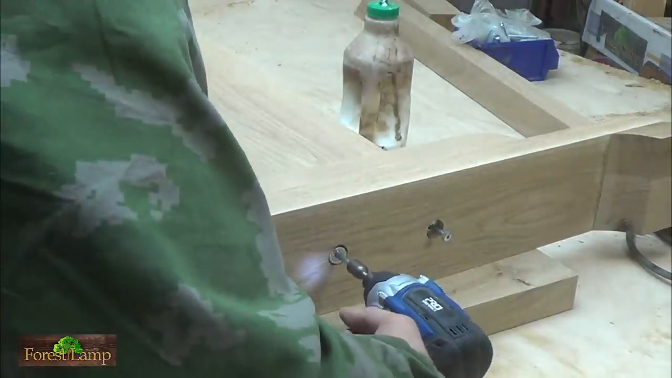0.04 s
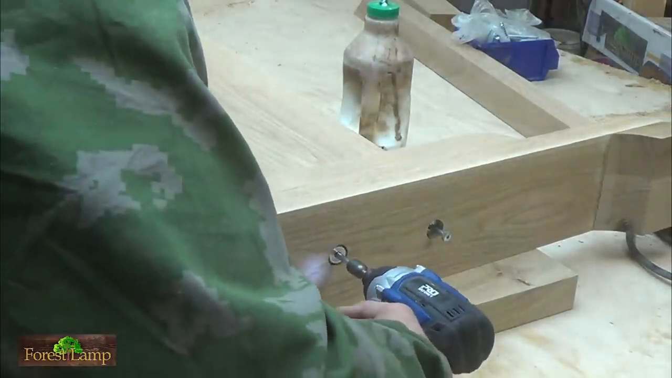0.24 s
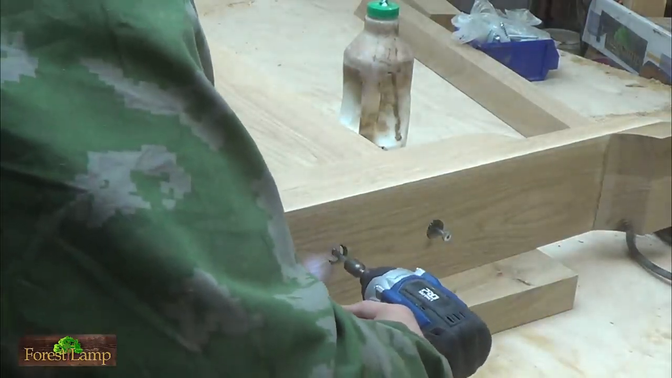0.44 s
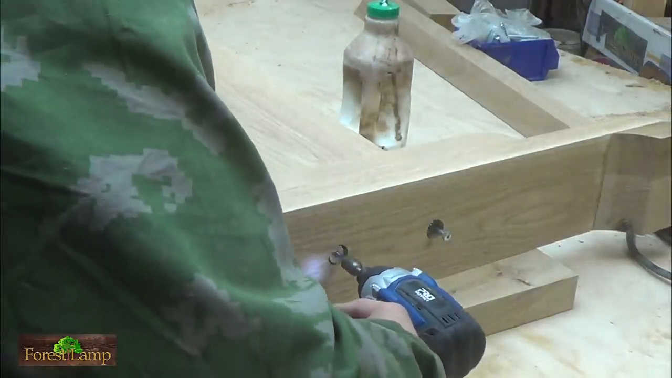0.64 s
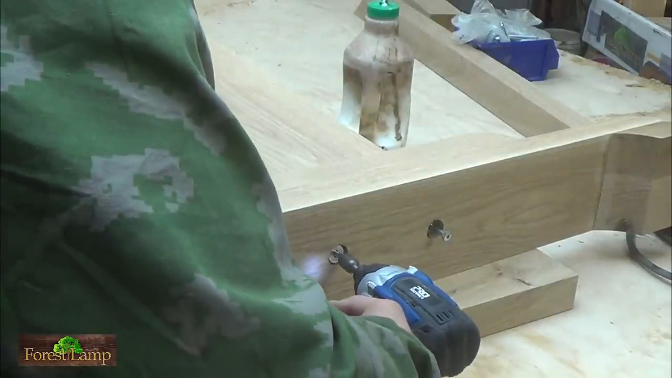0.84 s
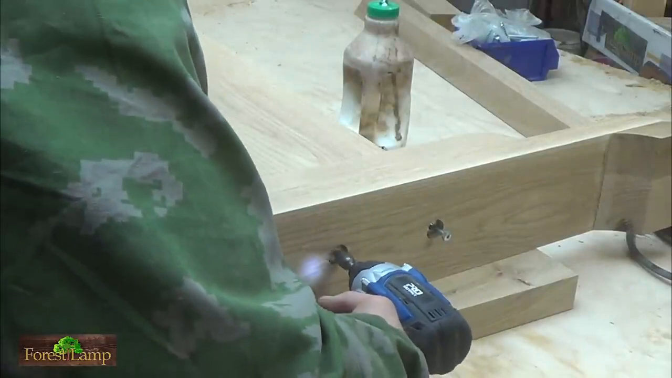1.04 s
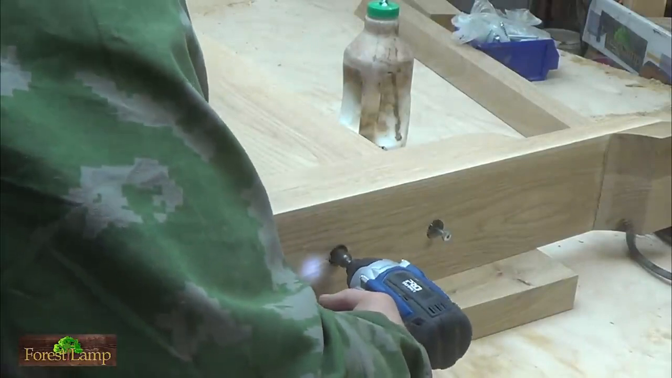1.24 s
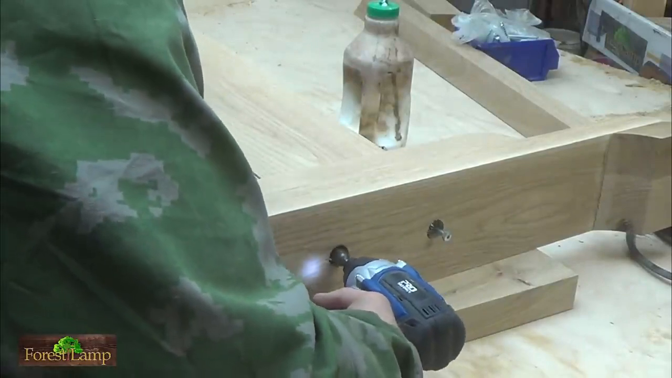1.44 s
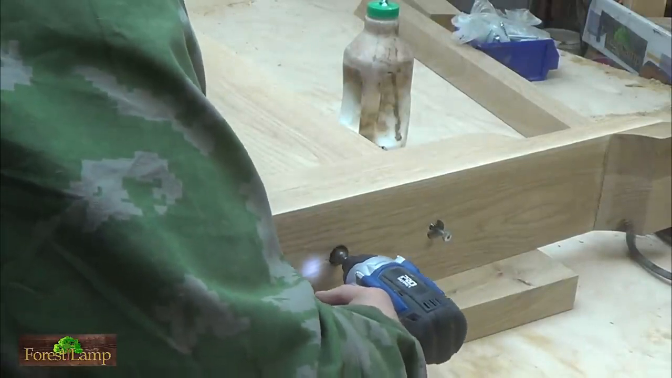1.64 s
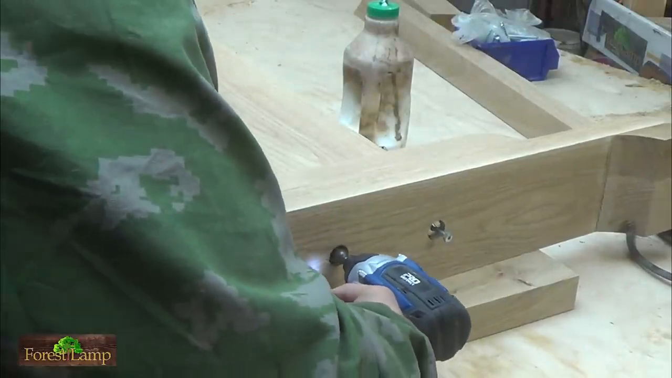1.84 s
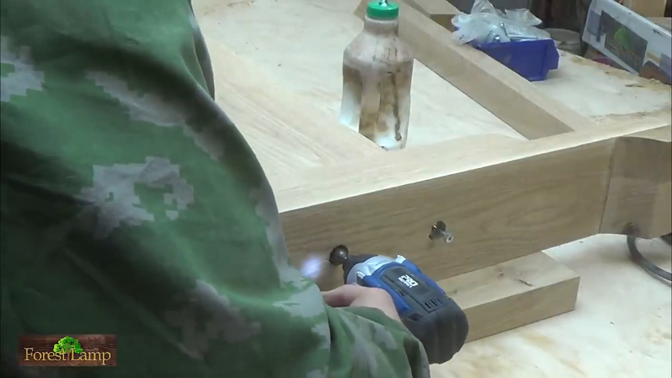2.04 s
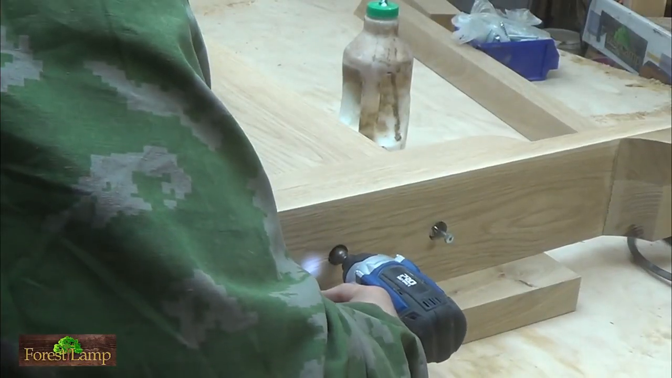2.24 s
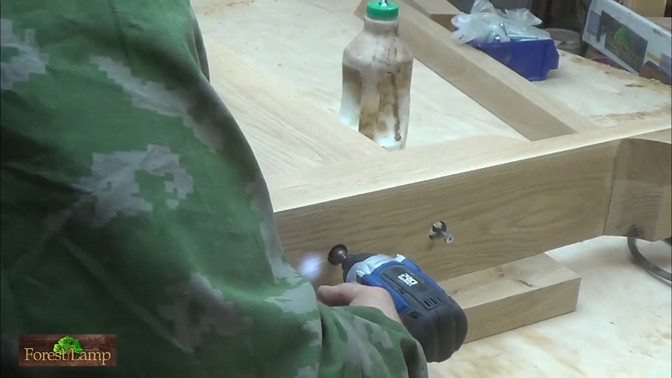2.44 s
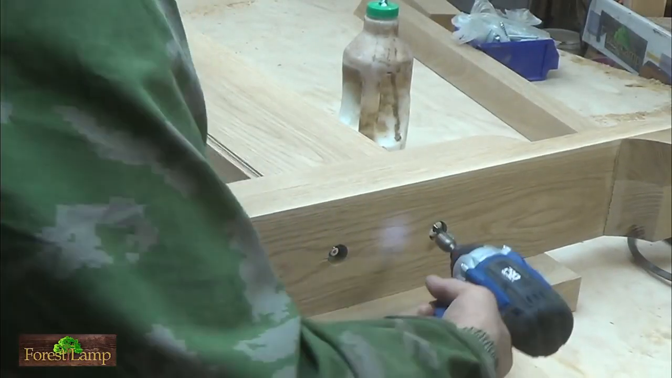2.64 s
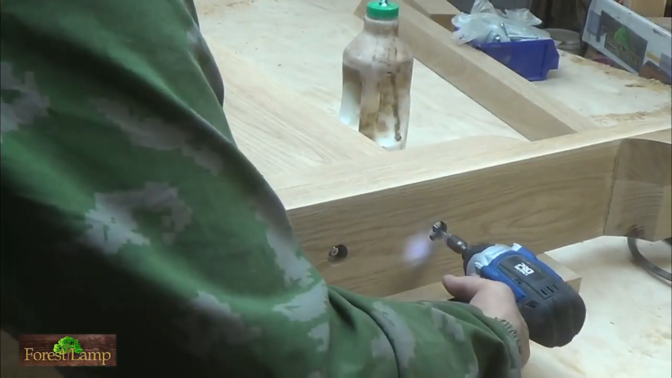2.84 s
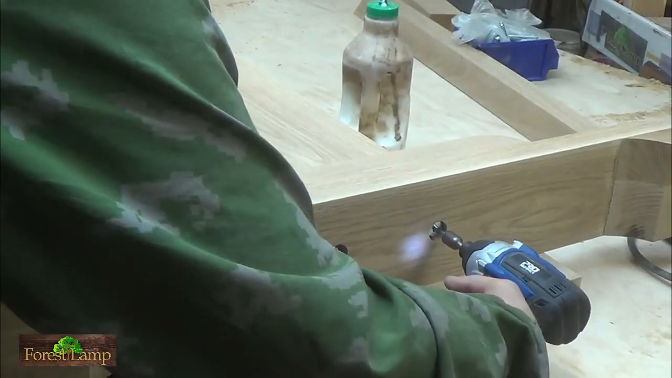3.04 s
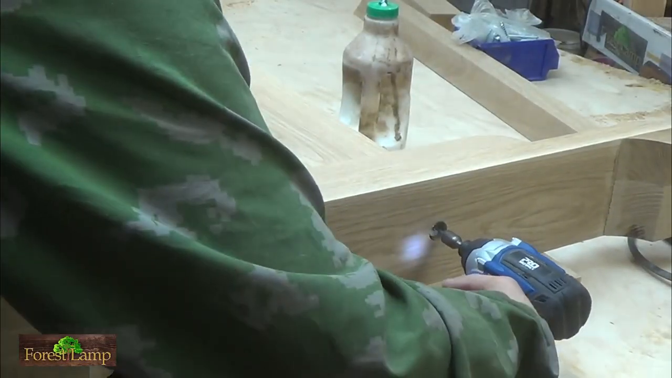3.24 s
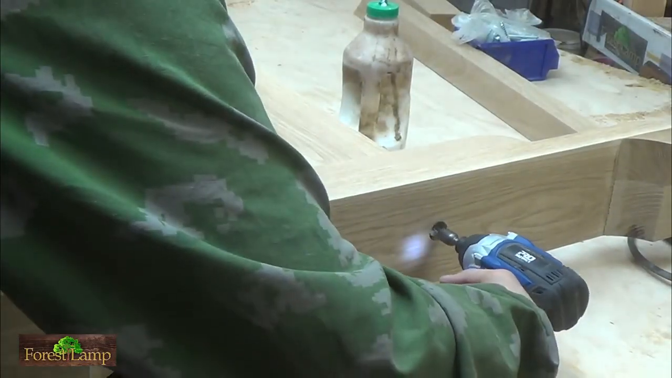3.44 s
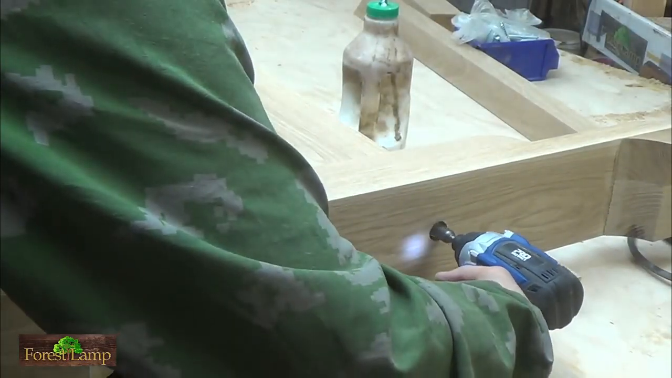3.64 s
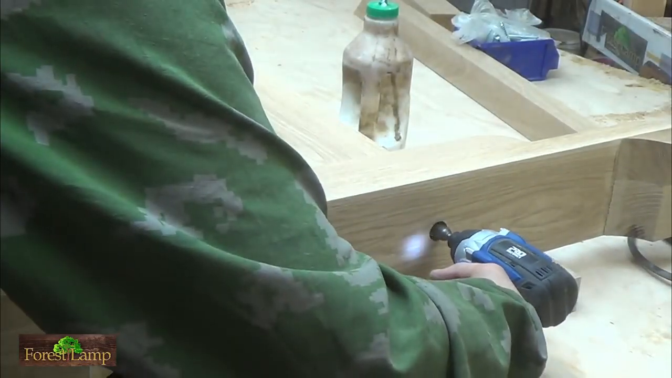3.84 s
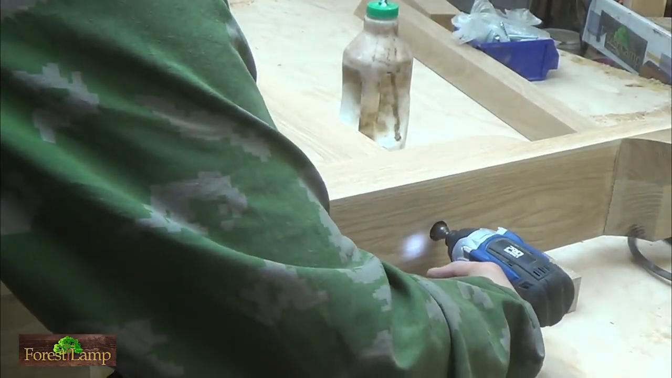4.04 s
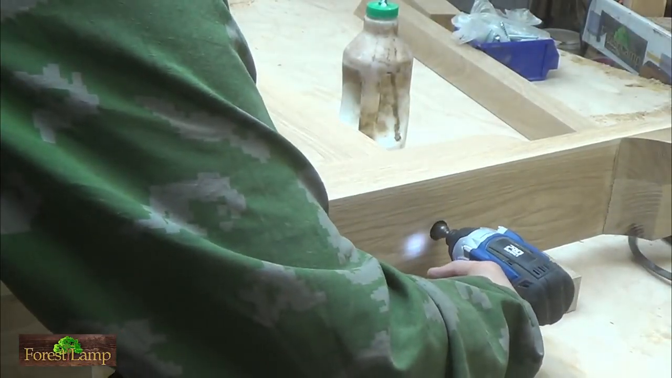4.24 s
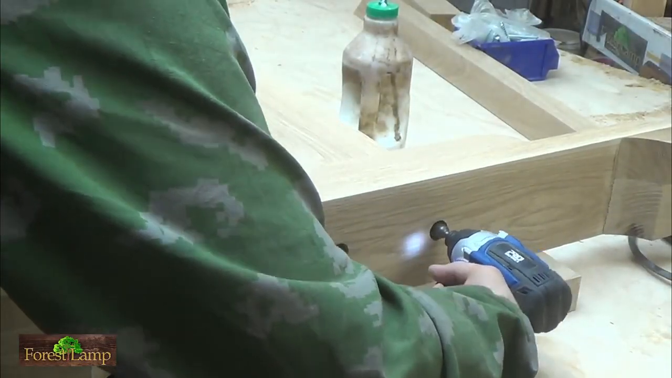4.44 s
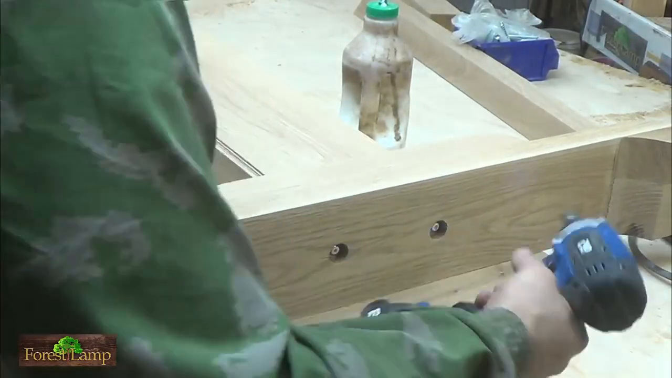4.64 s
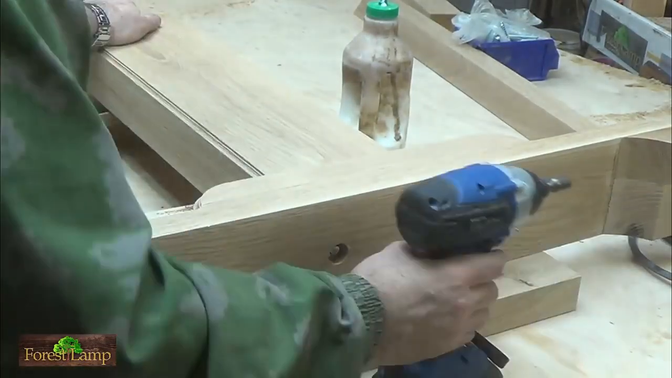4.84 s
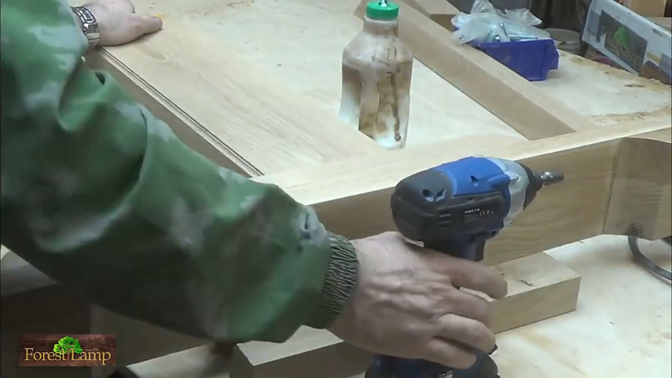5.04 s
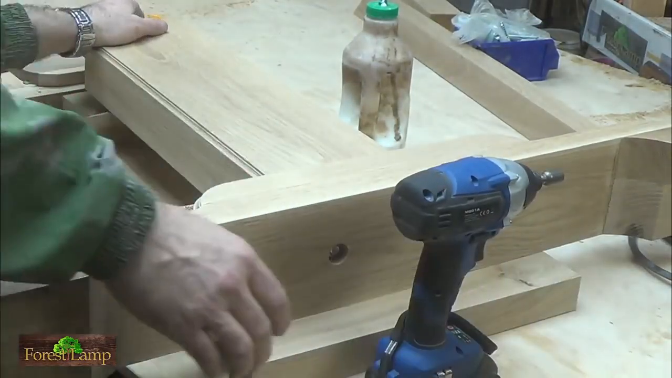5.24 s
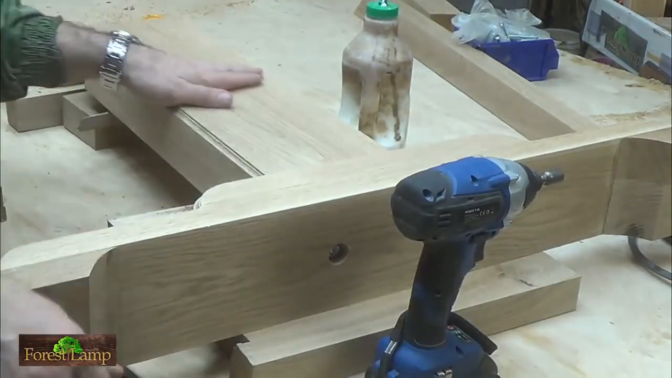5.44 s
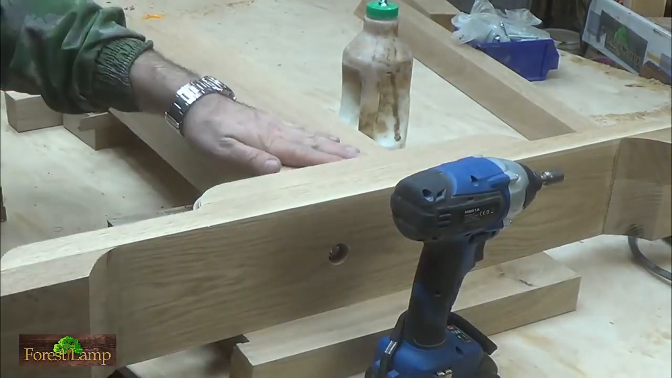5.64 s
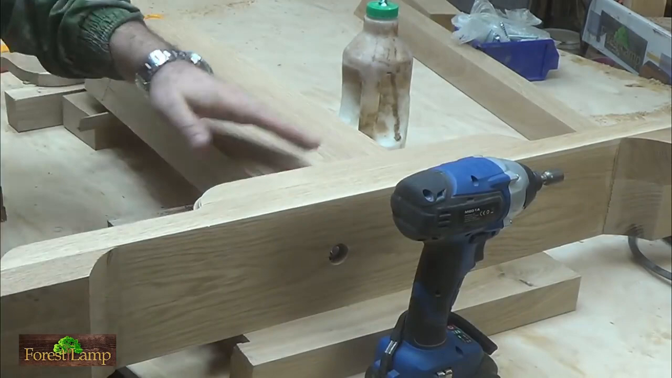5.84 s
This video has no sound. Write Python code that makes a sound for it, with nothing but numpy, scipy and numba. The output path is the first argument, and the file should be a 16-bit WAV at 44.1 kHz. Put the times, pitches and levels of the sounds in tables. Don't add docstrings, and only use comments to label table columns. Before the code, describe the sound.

Two harsh rattling bursts of an impact driver on wood, a short pause between them, then dull knocks and a soft hand rub.

```python
import sys
import numpy as np
from scipy import signal
from scipy.fft import rfft, irfft
from scipy.io import wavfile
from scipy.ndimage import uniform_filter1d
from numba import njit

SR = 44100
rng = np.random.default_rng(int(sys.argv[2]) if len(sys.argv) > 2 else 0)


def voltage_ratio(decibels):
    exponent = np.asarray(decibels, float) / 20
    return 10 ** exponent


def file_out(sig):
    cols = np.atleast_2d(sig).T
    lim = np.clip(cols, -1, 1)
    pcm = np.round(lim * 32767).astype(np.int16)
    wavfile.write(sys.argv[1], SR, pcm)


N = 260631
TIME = np.arange(N) / SR

# hammer engages in seconds, trigger released in seconds, gear rattle in dB,
# gap between blows in seconds, time to full load in seconds.
PULLS = [
    (-0.3, 0.0033, -35.5, .026, .05),
    (0.2469, 2.465, -34, 0.02, 0.041),
    (3.157, 4.466, -33, .0275, 0.011),
]
# time in seconds, grip of the head in the wood (0-1), stiffening of the joint (0-1).
SEATING = [(0, 0, 0), (1.2, 0, 0), (1.6, 1, 0), (2.3, .7, 0), (2.42, .7, 1), (2.6, .7, 1), (3.0, 0, 0),
           (4.03, 0, 0), (4.07, 1, 0), (4.2, 1, 0), (4.27, .75, 1), (4.31, .4, 1), (5.91, .4, 1)]
# frequency in Hz, level in dB per Hz.
CRACK = [(1500, -14), (3000, -1), (4000, 4.5), (6500, -3), (8500, -5), (11500, -1.5), (14000, -13),
         (16000, -3.5)]
CRACK_S = .0013
TURN_S = .0042
ENGAGE_DB = -8


def rms_one(x):
    return x / np.sqrt(np.mean(x ** 2) + 1e-20)


def even(x, seconds=0.071):
    return x / np.sqrt(uniform_filter1d(x ** 2, int(seconds * SR)) + 1e-12)


def in_time(rows):
    s, *columns = np.transpose(rows)
    return np.array([np.interp(TIME, s, c) for c in columns])


def colour(x, points, size=4096):
    hz, db = np.transpose(points)
    grid = np.maximum(np.arange(size // 2 + 1), 1) * SR / size
    cepstrum = irfft(np.log(voltage_ratio(np.interp(np.log(grid), np.log(hz), db))))
    cepstrum[1:size // 2] *= 2
    cepstrum[size // 2 + 1:] = 0
    return signal.oaconvolve(x, irfft(np.exp(rfft(cepstrum))))[:N]


def drift(rate_hz):
    r = np.exp(-2 * np.pi * rate_hz / SR)
    noise = rng.standard_normal(N + SR)
    return rms_one(signal.lfilter([1], [1, -2 * r, r * r], noise)[SR:])


def grains(per_s, spread_db):
    sizes = voltage_ratio(spread_db * np.minimum(rng.exponential(1, N), 5)) * rng.choice([-1, 1], N)
    return rms_one(sizes * (rng.random(N) < per_s / SR))


def bursts(times, levels_db, decay_s):
    clicks = np.full(N, 1e-12)
    clicks[np.round(np.asarray(times) * SR).astype(int)] = voltage_ratio(levels_db)
    envelope = signal.lfilter([1], [1, -np.exp(-1 / (decay_s * SR))], clicks)
    return envelope * rng.choice([-1, 1], N)


@njit
def resonate(x, cosine, r):
    y = np.zeros(len(x))
    for i in range(2, len(x)):
        y[i] = x[i] - x[i - 2] + 2 * r * cosine[i] * y[i - 1] - r * r * y[i - 2]
    return y * (1 - r * r) / 2


def shop_air():
    # frequency in Hz, level in dB per Hz.
    shop_hum = [(20, -19), (46, -21), (70, -23), (105, -7.5), (135, -15), (250, -15), (318, -11.5),
                (660, -25.5), (1020, -16.5), (1300, -27.5), (2060, -27.5), (3640, -37), (12500, -56.5),
                (13500, -70)]
    hum = rms_one(colour(rng.standard_normal(N), shop_hum))
    return voltage_ratio(-64) * hum * voltage_ratio(.6 * drift(3.8))


def electronic_whine():
    # frequency in Hz, level in dB.
    whine_tones = [(15622, -84)]
    return sum(voltage_ratio(db + 5 + 1.5 * drift(20)) * np.sin(2 * np.pi * hz * TIME) for hz, db in whine_tones)


def throttle(coast_db_per_s):
    spin_db_per_s, free_db = 749, -4.5
    on, off, _, _, settle = np.transpose(PULLS)[:, :, None]
    free = (TIME < on) * (free_db + spin_db_per_s * (TIME - on))
    engaging = ENGAGE_DB * (1 - np.clip((TIME - on) / settle, 0, 1))
    braking = coast_db_per_s * np.maximum(TIME - off, 0)
    return free + engaging - braking


def chatter():
    level_db, spread_db = -1, 5.5
    speed_wander = .06
    wander, strength = rng.standard_normal((int(N / SR / TURN_S), 2)).T
    s = np.cumsum(TURN_S * (1 + speed_wander * wander))
    db = level_db + spread_db * np.clip(strength, -2, 2)
    inside = s < TIME[-1]
    return colour(bursts(s[inside], db[inside], CRACK_S), CRACK)


def gear_rattle(load, coast_db_per_s):
    # frequency in Hz, level in dB per Hz.
    housing = [(1060, -21), (1800, -17.5), (1970, -3), (2060, -14.5), (2460, -8), (3140, -2), (3410, -1.5),
               (7290, -11), (8130, -15.5), (11600, -12.5), (15000, -17.5), (16000, -38.5)]
    level_db = np.max(throttle(coast_db_per_s) + np.array(PULLS)[:, 2:3], axis=0)
    teeth = load * grains(per_s=9000, spread_db=2.5) * voltage_ratio(1.2 * drift(150))
    return voltage_ratio(level_db) * (voltage_ratio(-6.0) * rms_one(colour(teeth, housing)) + chatter())


def blow_table():
    slip_s, play_s = .005, .0008
    first_db, blow_db, spread_db = -27.5, -22, 1.5
    s, peak_db = [], []
    for on, off, _, gap, settle in PULLS:
        slip, play, strength = rng.standard_normal((120, 3)).T
        since = np.arange(1, len(slip) + 1) * gap + slip_s * slip
        at = np.r_[on, on + TURN_S * np.round(since / TURN_S) + play_s * play]
        load_db = ENGAGE_DB * (1 - np.clip(since / settle, 0, 1))
        db = np.r_[first_db, blow_db + load_db + spread_db * np.clip(strength, -2, 1.5)]
        held = (at > 0) & (at < off)
        s, peak_db = np.r_[s, at[held]], np.r_[peak_db, db[held]]
    return s, peak_db


def hammer():
    bounce_s, bounce_db, dip_s = .0042, -5, .003
    s, peak_db = blow_table()
    peak_db = peak_db - 3.0
    crack = bursts(s, peak_db, CRACK_S) + bursts(s + bounce_s, peak_db + bounce_db, CRACK_S)
    blows = bursts(s, peak_db + 17.5, decay_s=0.0033)
    dips = np.zeros(N)
    dips[((s - dip_s / 2) * SR).astype(int)] = 1
    dip_depth = .85 * np.convolve(dips, np.hanning(int(dip_s * SR)), "same")
    return colour(crack, CRACK), blows, 1 - np.clip(dip_depth, 0, 1)


def rings(force, modes):
    grip, stiff = in_time(SEATING)
    out = 0
    for hz, width_hz, level_db, grip_db, rise in modes:
        cosine = np.cos(2 * np.pi * hz * (1 + rise * stiff) / SR)
        shaken = force * rng.choice([-1, 1], N)
        mode = resonate(shaken, cosine, np.exp(-np.pi * width_hz / SR))
        mode_db = level_db + grip_db * grip + 3.0 * drift(16)
        out = out + voltage_ratio(mode_db) * even(mode, seconds=0.035)
    return out


def shaken_frame(blows, ring_coast, hum_coast):
    # frequency in Hz, width in Hz, level in dB, dB gained by grip, share of rise when stiff (0-1).
    rings_first, rings_second = [(985, 50, -13, 0, 0), (1102, 16, -10, 4, .05), (1170, 15, 1.5, -1.5, .085),
                                 (1320, 20, -16, 4, .05), (1425, 16, -8, 0, .06), (1457, 12, -4, 4, .075),
                                 (1670, 50, -16, 1, 0), (2088, 12, -5, -2, .005), (2355, 40, -19, 0, 0),
                                 (3180, 60, -15, 0, 0)], [(930, 70, -10, 0, .03), (1305, 20, -16, 21, .19),
                                                      (1580, 100, -10, 0, 0), (2100, 35, -15, -3, 0),
                                                      (2360, 30, -17, 7, 0), (2580, 40, -17, 7, 0),
                                                      (3170, 150, -10, 0, 0)]
    hums_first, hums_second = [(125, 50, -26, 12, 0), (242, 35, -5, -2, 0), (385, 60, -14, 2, .05),
                               (577, 35, -12, 11, .2)], [(238, 22, -5, -9, .05), (570, 22, -17, 13, .22),
                                                   (700, 45, -12, 9, 0)]
    # frequency in Hz, level in dB per Hz.
    wood = [(18, -51), (30, -27.5), (103, -15.5), (240, -12), (367, 2.5), (561, 15), (809, -0.5),
            (1100, -1), (1560, -11.5), (1780, -7.5), (2080, -13), (3000, -3.5), (3900, -29), (6600, -120)]
    # ring in dB, its gain by grip in dB, hum in dB, its gain by grip in dB, its gain when stiff in dB.
    frame_levels = [
        (-32, 0.5, -42, 4, -6.5),
        (-35, 3.5, -37, -0.5, -0.5),
    ]
    second = TIME > 2.8
    grip, stiff = in_time(SEATING)
    ring_db, ring_grip_db, hum_db, hum_grip_db, hum_stiff_db = np.transpose(frame_levels)[:, second.astype(int)]
    ring_db = ring_db + ring_grip_db * grip + throttle(ring_coast).max(axis=0)
    hum_db = hum_db + hum_grip_db * grip + hum_stiff_db * stiff + throttle(hum_coast).max(axis=0)

    shake = rng.standard_normal(N) * voltage_ratio(1.6 * drift(40))
    force = shake + 4.3 * blows
    broad = rms_one(colour(force, wood))
    broad_low = signal.sosfilt(signal.butter(2, 830, "low", fs=SR, output="sos"), broad)
    broad_high = signal.sosfilt(signal.butter(2, 830, "high", fs=SR, output="sos"), broad)
    ring = np.where(second, rings(force, rings_second), rings(force, rings_first))
    hum = np.where(second, rings(force, hums_second), rings(force, hums_first))
    ring = even(ring + voltage_ratio(3.0) * broad_high)
    hum = even(hum + voltage_ratio(-2.0) * broad_low)
    return voltage_ratio(ring_db) * ring + voltage_ratio(hum_db) * hum


def driver():
    # rattle, ring, hum in dB per second.
    coast_rates = (515, 387, 391)
    rattle_coast, ring_coast, hum_coast = coast_rates
    crack, blows, load = hammer()
    return gear_rattle(load, rattle_coast) + crack + shaken_frame(blows, ring_coast, hum_coast)


def spin_up():
    whine_hz, width_hz, whine_db, spin_s = 3200, 120, -63, .032
    on = np.transpose(PULLS)[0, :, None]
    gate = ((TIME > on - spin_s) & (TIME < on)).any(axis=0)
    cosine = np.full(N, np.cos(2 * np.pi * whine_hz / SR))
    tone = resonate(rng.standard_normal(N), cosine, np.exp(-np.pi * width_hz / SR))
    return voltage_ratio(whine_db) * uniform_filter1d(gate * 1., 200) * even(tone, seconds=.02)


def taps():
    # time in seconds, thud in Hz, thud in dB, tick in dB.
    contacts = [(0.2282, 1430, -57, -56), (2.5344, 1620, -60, -71), (2.7604, 1060, -59.5, -63.5),
                (2.933, 635, -56.5, -56), (2.9676, 660, -59, -64), (2.9907, 555, -43, -43),
                (3.006, 260, -55, -86), (3.118, 966, -67, -54), (4.574, 1400, -49, -52),
                (4.7557, 483, -32, -38), (4.7744, 450, -46, -98), (4.793, 495, -42, -56),
                (4.836, 471, -72, -57), (4.885, 810, -42.5, -81), (4.9024, 530, -43.5, -90),
                (4.916, 486, -49, -87), (5.08, 1020, -63, -56), (5.2214, 470, -62, -74),
                (5.692, 1030, -58, -49)]
    # frequency in Hz, level in dB per Hz.
    bench = [(100, -28), (220, -10), (500, -4), (1200, -7), (2200, -13), (3500, -26), (7000, -48)]
    thud_s, thud_width_hz, thud_rise_s = .011, 130, .0028
    s, hz, thud_db, tick_db = np.transpose(contacts)
    tick = colour(bursts(s + .001, tick_db - 2.5, decay_s=0.0034), CRACK)
    latest = np.maximum(np.searchsorted(s, TIME) - 1, 0)
    soft = np.clip((TIME - s[latest]) / thud_rise_s, .3, 1)
    thud = colour(soft * bursts(s, thud_db + 14.5, thud_s), bench)
    cosine = np.cos(2 * np.pi * hz[latest] / SR)
    pitched = resonate(thud, cosine, np.exp(-np.pi * thud_width_hz / SR))
    return tick + thud + voltage_ratio(8.0) * pitched


def hand():
    # middle in seconds, half length in seconds, hiss in dB.
    palm_strokes = [(4.9, 0.11, -80.5), (5.07, 0.062, -77), (5.383, .07, -80), (5.545, 0.13, -65),
                    (5.805, .07, -73)]
    # frequency in Hz, level in dB per Hz.
    skin, boards = [(2060, -28.5), (3500, -3), (4320, -8), (5630, -3), (7660, -9), (11400, 3), (13200, -3),
                    (15300, -9)], [(12, -38), (20, -24), (100, -3), (279, -11.5), (321, 0), (359, -17),
                                  (460, -12), (544, -20.5), (608, -18.5), (896, -15.5), (1000, -12.5),
                                  (8250, -38.5), (15200, -40)]
    lean_s, lean_db, lean_db_per_s = 4.68, -68.5, 9.0
    fade_db, rest_db = 16, -95
    leaning = TIME > lean_s
    stroking = sum(voltage_ratio(db - fade_db * ((TIME - s) / half) ** 2) for s, half, db in palm_strokes)
    hiss = rms_one(colour(grains(per_s=7500, spread_db=2.5), skin)) * voltage_ratio(1.9 * drift(30))
    shuffle = rms_one(colour(rng.standard_normal(N), boards)) * voltage_ratio(1.5 * drift(25))
    weight = leaning * voltage_ratio(lean_db + lean_db_per_s * (TIME - lean_s))
    return (stroking + voltage_ratio(rest_db) * leaning) * hiss + weight * shuffle


def workshop(x):
    # frequency in Hz, left minus right in dB.
    tilt = [(25, -3), (60, -4.8), (125, -2.6), (250, -1.9), (500, 1.3), (1000, .5), (2000, -.7),
            (4000, -.8), (8000, 0)]
    # frequency in Hz, share of side reflections in dB.
    side_share = [(25, -10), (60, -11), (125, -6), (250, -12), (500, -10), (1000, -10), (2000, -11),
                  (4000, -13), (8000, -11), (12000, -22), (16000, -25)]
    t60_s = .16
    t = np.arange(int(.4 * SR)) / SR
    tails = rng.standard_normal((2, len(t))) * voltage_ratio(-60 * t / t60_s) * (t > .002)
    common, side = (signal.oaconvolve(x, tail / np.linalg.norm(tail))[:N] for tail in tails)
    mid = x + voltage_ratio(-15) * common
    left, right = (colour(mid, [(hz, sign * db / 2) for hz, db in tilt]) for sign in (1, -1))
    return np.array([left, right]) + colour(side, side_share) * [[1], [-1]]


def scene():
    sources = shop_air() + driver() + spin_up() + taps() + hand()
    return workshop(sources) + electronic_whine()


def low_pass(x):
    return signal.sosfilt(signal.butter(12, 16250, fs=SR, output="sos"), x)


def record(dry):
    steep = signal.cheby2(14, 60, 16400, fs=SR, output="sos")
    return low_pass(signal.sosfilt(steep, dry))


dry = scene()
out = record(dry)
file_out(out)
```